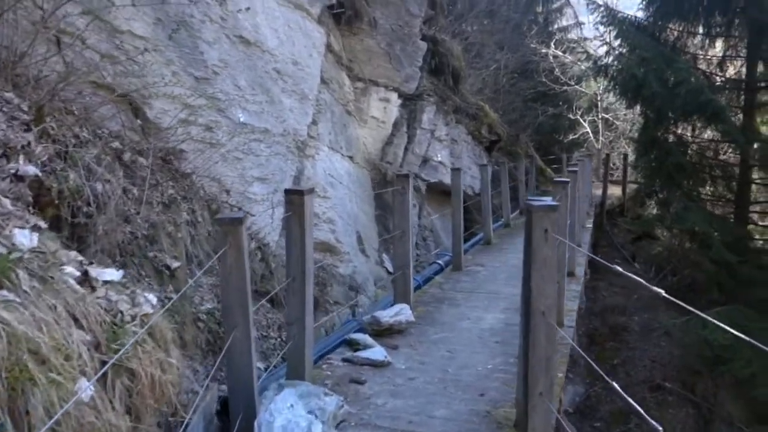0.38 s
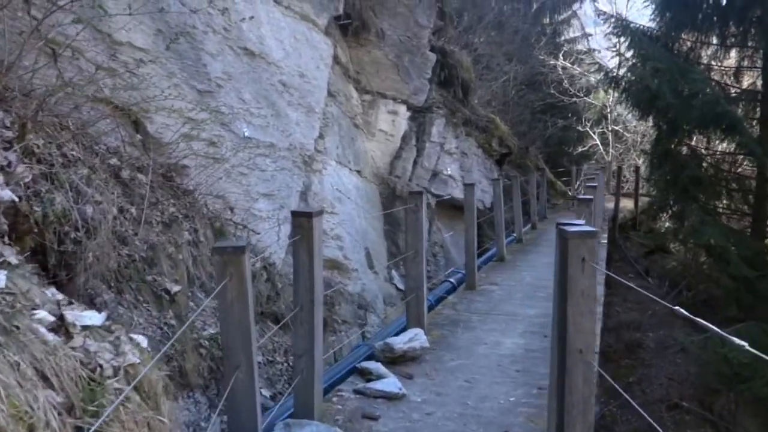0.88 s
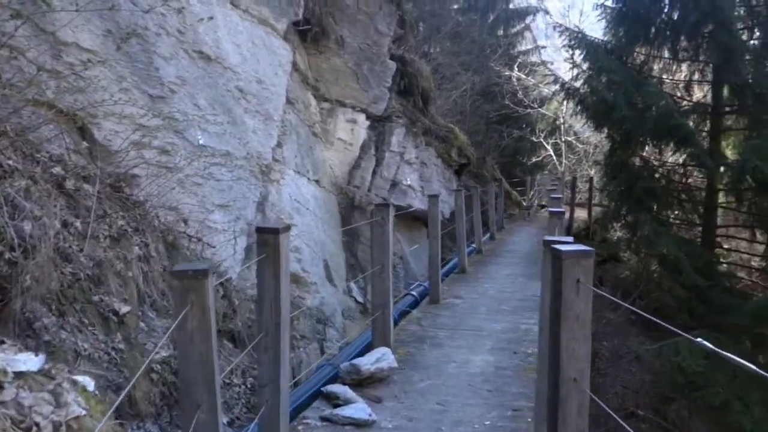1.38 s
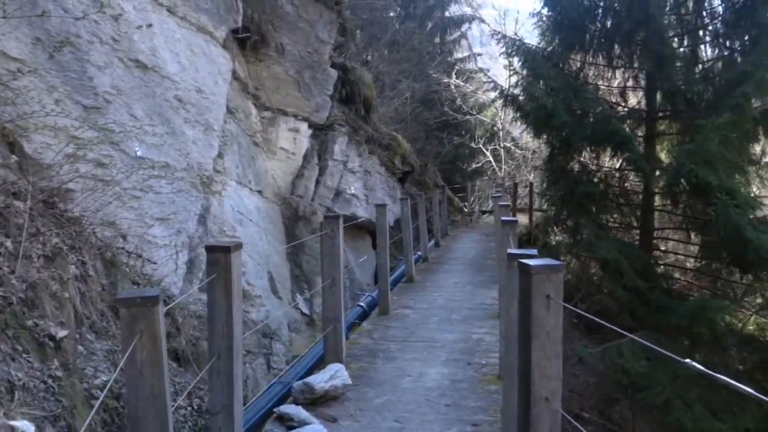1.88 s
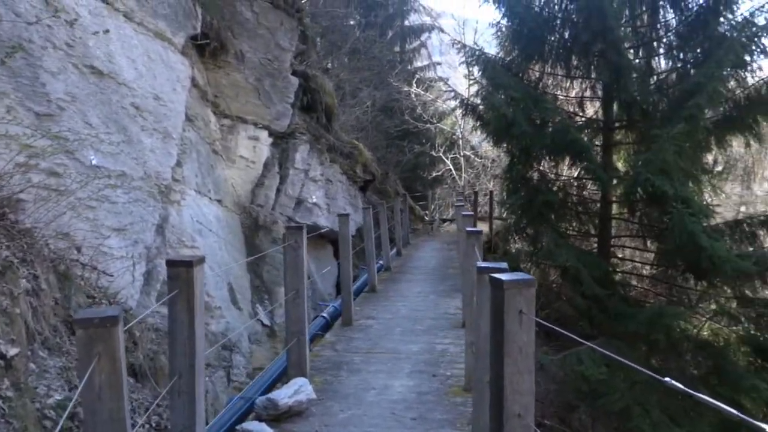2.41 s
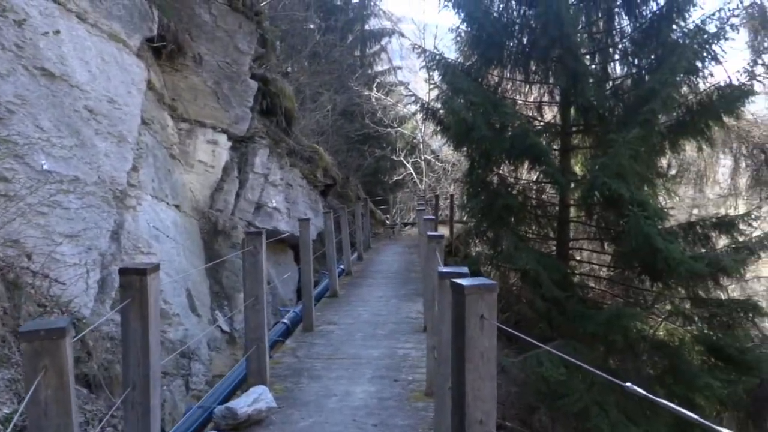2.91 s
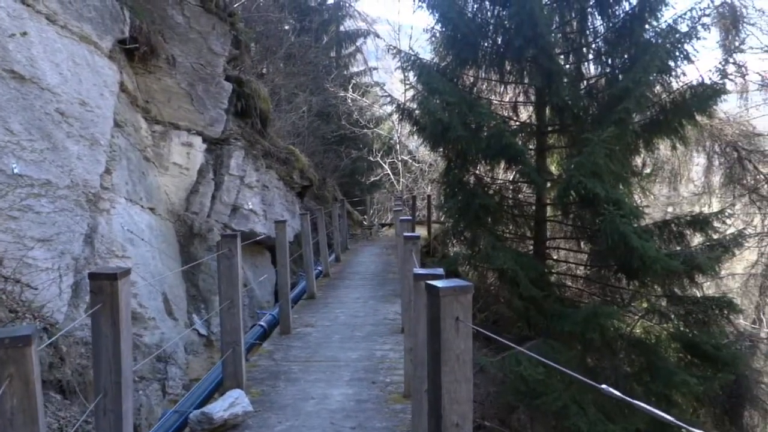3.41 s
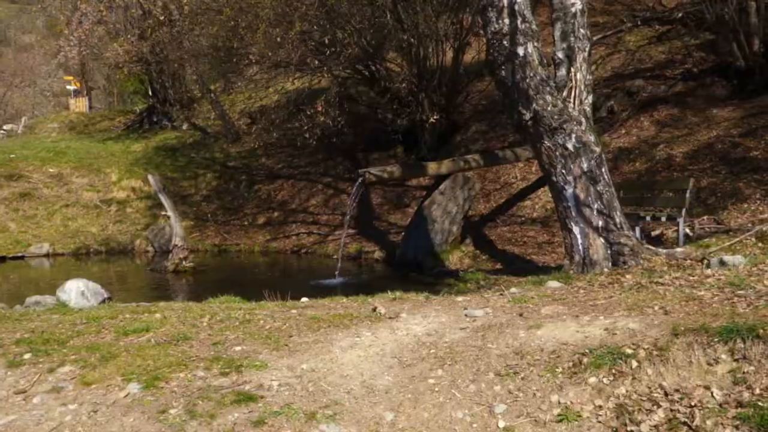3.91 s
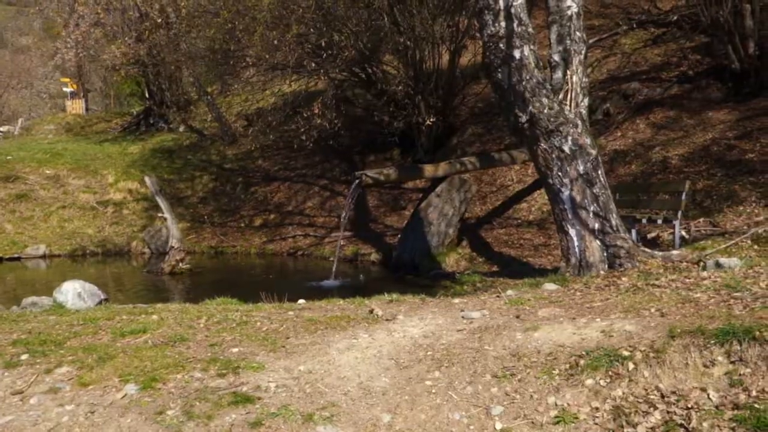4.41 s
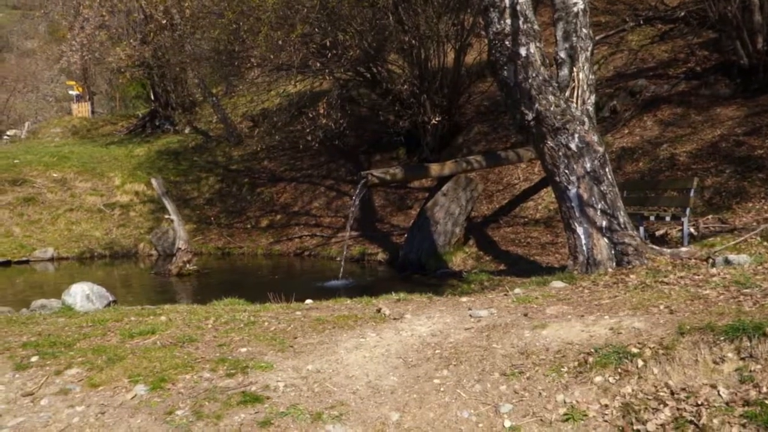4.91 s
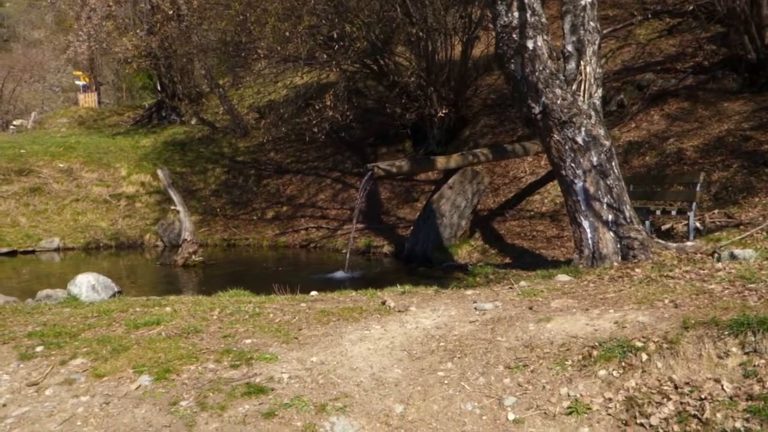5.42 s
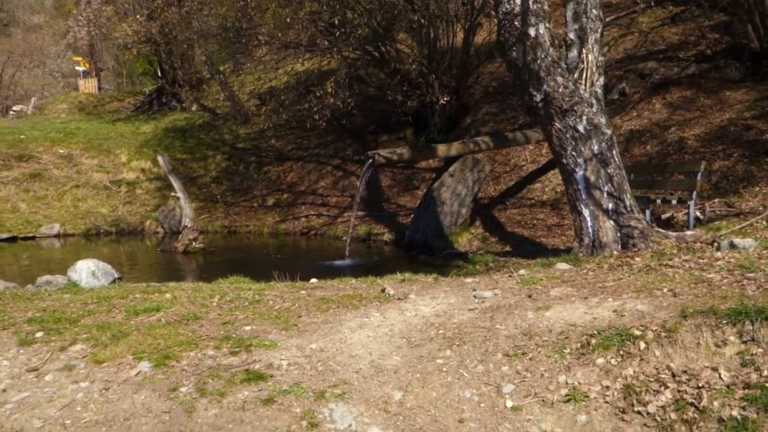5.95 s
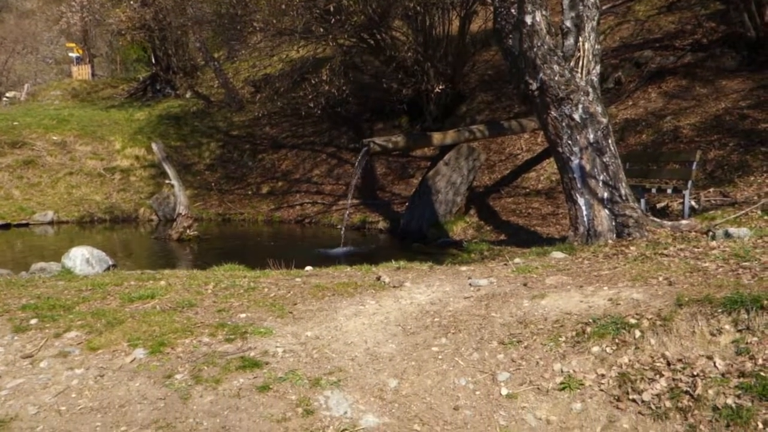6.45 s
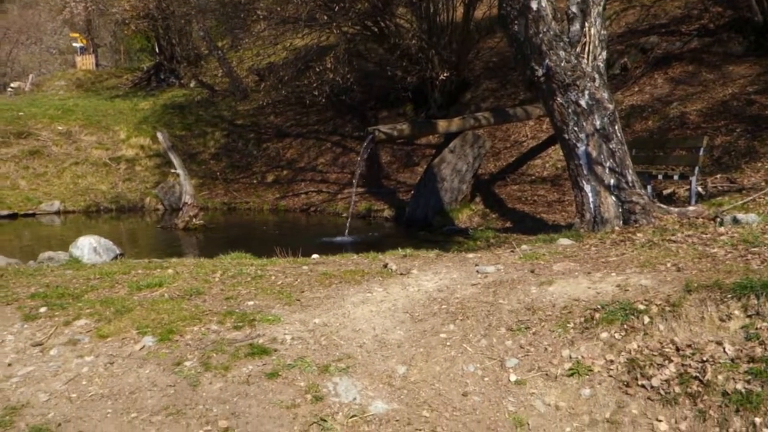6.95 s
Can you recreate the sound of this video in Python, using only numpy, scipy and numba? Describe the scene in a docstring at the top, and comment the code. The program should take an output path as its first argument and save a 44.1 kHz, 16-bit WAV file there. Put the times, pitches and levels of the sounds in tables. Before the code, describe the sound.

Outdoors on a cliff path, a faint steady stream rushes far below while tiny birds twitter very high; a dull knock comes early and a small bright tick late. It cuts off to a brief silence. Then, much louder, a thin jet of water splashes and plops into a pond, a bird on the left repeats a sweeping whistled phrase, and others chirp far away among trees. Stereo microphone, light low wind.

```python
"""The rush of a distant stream below a cliff path, faint high birds, a knock and late ticks; then a short silence.
Next a jet of water falls from a spout into a pond, a bird repeats its phrase close by on the left,
others call far off among trees, and light wind touches the microphone.
Stream, jet and wind are filtered noise that flickers band by band; bubbles, drops and knocks are damped rings.
Birds are near-sine whistles along pitch curves, with sprays of noise as echoes from trunks and rock."""
import sys
import numpy as np
from scipy import signal
from scipy.fft import rfft, irfft, next_fast_len
from scipy.io import wavfile
from scipy.ndimage import uniform_filter1d, map_coordinates
from numba import njit

SR = 44100
rng = np.random.default_rng(int(sys.argv[2]) if len(sys.argv) > 2 else 0)


def rack_gain(trim_db):
    """Turn a fader trim in dB into the linear factor to multiply a signal by."""
    fader = np.asarray(trim_db, float)
    return 10 ** (fader / 20)


def wav_record(signal):
    """Record a signal, one row per channel, as 16-bit PCM in the file named by sys.argv[1]."""
    frames = np.transpose(np.atleast_2d(signal))
    bounded = np.clip(frames, -1, 1)
    # unit amplitude maps onto the largest positive 16-bit level
    quanta = np.round(bounded * 32767).astype(np.int16)
    wavfile.write(sys.argv[1], SR, quanta)


N = 311787
T = np.arange(N) / SR

# how the pond fades in: time_s, gain (0-1)
POND_FADE = [(3.907, 0), (3.922, 0.94)]
# where the jet and its bubbles sit between the channels: frequency_hz, left_minus_right_db
JET_PAN = [(60, -4.5), (110, -6), (200, -6.5), (360, -7.5), (640, -1), (1170, -0.5), (2110, 0), (3830, 0),
           (6930, 0.5), (12600, 0)]


def curve(table, x, column=1):
    """Straight lines between table rows."""
    rows = np.array(table, float)
    return np.interp(x, rows[:, 0], rows[:, column])


def by_pitch(table, hz):
    """A table over frequency, read on a log axis."""
    rows = np.array(table, float)
    return np.interp(np.log(hz), np.log(rows[:, 0]), rows[:, 1])


def walk(rate):
    """Random levels held 1 / rate s and slewed twice; spread near 1."""
    k = int(SR / rate)
    steps = np.repeat(rng.standard_normal(N // k + 1), k)
    return 1.41 * uniform_filter1d(uniform_filter1d(steps, k), k)[:N]


def lowpass(x, hz):
    """Gentle second-order treble cut."""
    return signal.sosfilt(signal.butter(2, hz, fs=SR, output="sos"), x)


def place(x, pan_db, lag):
    """Two microphones: a level difference, and the right one hears it lag samples later."""
    late = map_coordinates(x, [np.arange(N) - lag], order=3)
    return np.array([x * rack_gain(pan_db / 2), late * rack_gain(-pan_db / 2)])


def echoes(x, t60, db, delay_s=0.0049):
    """Scattering from trunks and rock: a decaying spray of reflections, other ones in each channel."""
    t = np.arange(int(.6 * SR)) / SR
    tail = rng.standard_normal((2, len(t))) * (t > delay_s) * rack_gain(-60 * t / t60)
    tail *= rack_gain(db) / np.sqrt(np.sum(tail ** 2, axis=1, keepdims=True))
    return signal.fftconvolve(x[None], tail, axes=1)[:, :N]


def hiss(colour, like, pan, lag, rms_db, shared_db, own_db, rate):
    """Noise in half-octave bands; each band flickers alone and with the others."""
    size = next_fast_len(N)
    hz = np.maximum(np.fft.rfftfreq(size, 1 / SR), 1)
    left, other = rfft(rng.standard_normal((2, size)))
    alike = np.clip(by_pitch(like, hz), 0, 1)
    right = alike * left * np.exp(-2j * np.pi * hz * lag / SR) + np.sqrt(1 - alike ** 2) * other
    half_db = by_pitch(pan, hz) / 2
    pair = np.array([left * rack_gain(half_db), right * rack_gain(-half_db)]) * rack_gain(by_pitch(colour, hz))
    place_in_bank = 2 * np.log2(hz / 20)
    shared = walk(rate)
    out = 0
    for k in range(20):
        band = irfft(pair * np.clip(1 - abs(place_in_bank - k), 0, 1), size)[:, :N]
        out = out + band * rack_gain(shared_db * shared + own_db * walk(rate))
    return out * rack_gain(rms_db) / np.sqrt(np.mean(out.mean(0) ** 2))


@njit
def ring(out, start, hz, cycles, glide, size):
    """Damped rings whose pitch can rise as they die, as a bubble's does near the surface."""
    for k in range(len(start)):
        length = cycles[k] * SR / hz[k]
        phase = 0.
        for i in range(min(int(4 * length), len(out) - start[k])):
            u = i / length
            phase += 2 * np.pi * hz[k] * (1 + glide[k] * u) / SR
            out[start[k] + i] -= size[k] * np.sin(phase) * (1 - np.exp(-12 * u)) * np.exp(-u * u)
    return out


def grains(s, hz, cycles, db, glide):
    """Rings at given times; glide is the share by which pitch climbs over a ring's length."""
    return ring(np.zeros(N), (s * SR).astype(np.int64), 1. * hz, cycles + 0 * s, glide + 0 * s, rack_gain(db))


def from_jet(s, hz, cycles, db, glide):
    """Rings heard from where the jet lands: the low ones lean to the right."""
    half_db = by_pitch(JET_PAN, hz) / 2
    return np.array([grains(s, hz, cycles, db + side * half_db, glide) for side in (1, -1)])


def swarm(count, lo_hz, hi_hz, cycles, db, scatter_db, glide):
    """Many random rings over the pond, most of them small; columns as for grains."""
    u = rng.random((count, 5)).T
    first_s = POND_FADE[0][0]
    s = first_s + u[0] * (T[-1] - first_s)
    hz = lo_hz * (hi_hz / lo_hz) ** u[1]
    size_db = db - scatter_db * np.log(np.maximum(u[2], 1 / 50))
    return s, hz, cycles * (0.25 + 1.44 * u[3]), size_db, 2 * glide * u[4]


def whistle(notes, flutter_db=0., warble=0., edge_s=0.0021):
    """Near-sine notes along (s, Hz, dB) rows, with soft ends; level and pitch can tremble."""
    out = np.zeros(N)
    slow, fast = walk(90), walk(300)
    for note in notes:
        i = np.arange(int((note[0][0] - edge_s) * SR), min(int((note[-1][0] + edge_s) * SR), N))
        hz = uniform_filter1d(curve(note, i / SR), 90) * (1 + warble * fast[i])
        ends = np.clip(np.minimum(i - i[0], i[-1] - i) / (edge_s * SR), 0, 1)
        gain = rack_gain(curve(note, i / SR, 2) + flutter_db * slow[i])
        out[i] += np.sqrt(2) * gain * ends * np.sin(2 * np.pi * np.cumsum(hz) / SR)
    return out


def distant_stream():
    """A steady rush far below, coloured noise that swells and sinks as the air moves."""
    # spectrum of the rush: frequency_hz, level_db (per Hz)
    colour = [(18, -74), (30, -47), (71, -36.5), (264, -10.5), (298, -9), (346, -7), (392, -7), (477, -8.5),
              (527, -5.5), (567, -4.5), (1190, -10.5), (2100, -18.5), (2970, -30), (11000, -41.5),
              (14300, -72), (22000, -120)]
    # likeness of the two channels: frequency_hz, likeness (0-1)
    like = [(60, 0.96), (280, 0.98), (600, 0.96), (1300, 0.8), (2700, 0.43), (5800, 0.29), (11000, 0)]
    # stereo lean: frequency_hz, left_minus_right_db
    pan = [(60, 0), (110, -1), (200, -0.5), (360, -0.5), (640, -2.5), (1170, -3.5), (2110, -3), (3830, -5),
           (6930, 1.5), (12600, -3)]
    # swell of the rush: time_s, level_db
    rush = [(0, 0.5), (.2, 0.5), (.3, 0), (.42, 0), (.48, 0.5), (.8, -0.13), (1.4, -0.5), (2.4, .5),
            (3.2, -.5), (3.8, 0.5)]
    stream = hiss(colour, like, pan, lag=-1.9, rms_db=-40, shared_db=0.19, own_db=0.51, rate=6.43)
    low = lowpass(stream, 3000)
    swell_db = curve(rush, T)
    # the treble moves 3.5 times as far in dB
    return low * rack_gain(swell_db) + (stream - low) * rack_gain(3.5 * swell_db)


def cliff_birds():
    """Small birds: a held whistle with a falling chirp, and a thin twitter of glides high in the trees."""
    # whistle and chirp, one list a note: time_s (from call start), pitch_hz, level_db (within the call)
    call = [
        [(0, 5900, -12), (.015, 6700, -1), (.035, 7173, 0), (.065, 7374, -1), (.16, 7400, -14)],
        [(.168, 6280, -9), (.176, 4950, -3), (.185, 4180, -2.5), (.193, 3700, -4)],
    ]
    # when it calls: start_s, level_db, tempo_stretch (factor)
    call_times = [(1.595, -52.5, 1.02), (1.908, -52.5, .98)]
    # twitter, one glide a row: start_s, length_ms, from_hz, to_hz, level_db (in mid-glide)
    twitter = [(.015, 28, 8960, 9800, -54), (.04, 34, 8604, 8500, -54), (.075, 33, 8700, 10800, -49),
               (.112, 14, 10800, 10200, -48), (.128, 28, 9400, 8850, -52), (.175, 26, 9100, 7850, -51),
               (1.955, 42, 9200, 8650, -55), (1.995, 68, 8800, 9600, -59), (1.97, 70, 9650, 9650, -66),
               (2.05, 70, 9550, 9200, -58), (2.12, 25, 9200, 9800, -61), (2.145, 25, 9300, 8900, -63),
               (2.175, 95, 9170, 9550, -59.5), (2.3, 38, 9150, 9500, -55), (2.325, 58, 9600, 11000, -61),
               (2.395, 30, 11000, 9900, -58), (2.41, 41, 9100, 8750, -63), (2.5, 50, 9100, 9500, -61),
               (2.51, 30, 9800, 10200, -65), (2.55, 35, 9400, 9100, -64), (2.585, 55, 11000, 10700, -62),
               (2.64, 15, 10800, 9800, -60), (2.59, 39.8, 9100, 9400, -61), (2.645, 45, 8750, 9600, -58),
               (2.68, 15, 9600, 10060, -54), (2.697, 18, 10060, 9550, -52), (2.7, 80, 9200, 8980, -60),
               (2.782, 15, 9600, 10000, -65), (2.78, 55, 8600, 7400, -66), (2.85, 25, 7400, 7300, -68),
               (2.835, 55, 8800, 9000, -71), (3.165, 27, 9000, 8600, -68), (3.378, 28.3, 6880, 7250, -68),
               (3.735, 85, 8050, 8600, -61)]
    swell_db = 7.5  # a glide is this much softer at its ends than in its middle
    calls = [[(s0 + s * stretch, hz, db + gain_db) for s, hz, db in note]
             for s0, gain_db, stretch in call_times for note in call]
    glides = [[(s, lo, db - swell_db), (s + ms / 2000, (lo + hi) / 2, db), (s + ms / 1000, hi, db - swell_db)]
              for s, ms, lo, hi, db in twitter]
    birds = whistle(calls, flutter_db=2., warble=.003) + whistle(glides, flutter_db=4., warble=.006)
    # the long way round through the air takes the top off the echoes
    dull = lowpass(birds, 5500)
    return place(birds, 4., 1.5) + echoes(dull, .4, 4.) + echoes(birds, .25, -8.)


def path_knocks():
    """Knocks and ticks on the path, each a ring of a cycle or two with a short echo."""
    # start_s, pitch_hz, level_db, length_cycles
    knock_rings = [(.2214, 1250, -10.5, 1.0), (.2214, 2650, -31, 2.1), (.2272, 900, -26, 1.1),
                   (.2305, 497, -25, 1.6), (1.106, 111, -43, 1.7), (1.11, 483, -27, 2.),
                   (3.507, 7000, -28.5, .79), (3.515, 8000, -45, 1.)]
    s, hz, db, cycles = np.transpose(knock_rings)
    knocks = grains(s, hz, cycles, db, 0.)
    knocks = signal.sosfilt(signal.butter(2, 130, "high", fs=SR, output="sos"), knocks)
    # wooden knocks are dull, the late ticks bright
    ticks_s = s[hz > 4000].min() - .01
    knocks = np.where(T < ticks_s, lowpass(knocks, 4000), knocks)
    return place(knocks, -1., -.6) + echoes(knocks, .07, -5.)


def cliff():
    """Stream far below, small birds in the trees, a few knocks nearby, all cut steeply above 11.1 kHz."""
    out = distant_stream() + cliff_birds() + path_knocks()
    return signal.sosfilt(signal.ellip(10, .3, 60, 11100, fs=SR, output="sos"), out)


def far_birds():
    """Two arched notes a call, from so far that mostly their echoes arrive."""
    # one list a note: time_s (from call start), pitch_hz, level_db (within the call)
    call = [
        [(0, 4500, -3), (.012, 5800, -1), (.02, 6745, 6), (.03, 7060, -2), (.048, 5390, -25)],
        [(.072, 3800, -1), (.088, 4926, 5.5), (.108, 4010, -17)],
    ]
    # when they call: start_s, level_db, pitch_factor
    call_times = [(4.18, -28, 0.95), (5.875, -29, 0.99), (6.484, -26.5, 0.98), (6.754, -34, .86),
                  (6.945, -38, 1)]
    calls = [[(s0 + s, hz * factor, db + gain_db) for s, hz, db in note]
             for s0, gain_db, factor in call_times for note in call]
    far = whistle(calls, flutter_db=1.5, warble=.055)
    return place(far, .6, -3.) * rack_gain(-10.) + echoes(far, .45, 2.5, delay_s=.003)


def falling_trill():
    """Five quick notes on the left, each falling in pitch and louder than the one before."""
    start_s, gap_s, note_s = 6.338, .0155, .009
    top_hz, fall = 5200, .2  # fall: share of the pitch lost in a note
    notes = []
    for k in range(5):
        s = start_s + k * gap_s
        db = -38 + k * 1.5
        notes.append([(s, top_hz, db), (s + note_s, (1 - fall) * top_hz, db)])
    return place(whistle(notes), 5.4, -0.82)


def near_bird():
    """A singer close on the left repeats four sweeping notes; a ground reflection combs its tone."""
    # the four notes: time_s (from phrase start), pitch_hz, level_db (within the phrase)
    phrase = [
        [(0, 3240, -29), (.008, 3694, -22), (.016, 3983, -16), (.024, 3850, -16), (.044, 3060, -31.5)],
        [(.088, 4040, -32), (.105, 4196, -12.5), (.13, 4524, -22), (.134, 4430, -37)],
        [(.182, 5090, -31), (.19, 5394, -20), (.197, 5290, -18), (.207, 4685, -15.5), (.217, 3820, -19),
         (.222, 3540, -17)],
        [(.229, 3650, -22), (.24, 4650, -17), (.246, 5290, -21.5), (.253, 5044, -16.5), (.263, 4193, -15.5),
         (.273, 3683, -19.5), (.298, 3084, -27), (.315, 2800, -31.5)],
    ]
    # repeats, the first joined late and sung softly: start_s, then level_db of each of the four notes
    repeats = [(3.892, -60, -39, -24, -13), (4.29, -7, -2.5, -1, -0.5), (4.689, 0.5, 0, -1.5, -0.5),
               (5.0865, 0, 1.5, -1.5, -2)]
    notes = []
    for k, (s0, *gains_db) in enumerate(repeats):
        tempo = 1 - k * .01  # each repeat is a little shorter
        for note, gain_db in zip(phrase, gains_db):
            notes.append([(s0 + s * tempo, hz, db + gain_db) for s, hz, db in note])
    near = whistle(notes, flutter_db=.7)
    notch_gap_hz, bounce = 658.2, 0.93  # spacing of the notches, share of the reflection
    near += bounce * map_coordinates(near, [np.arange(N) - SR / notch_gap_hz], order=3)
    return place(near, 9.14, -5.0) + echoes(near, 0.99, -12.5)


def jet_and_wind():
    """Hiss of the falling jet with light wind in the bass, as flickering coloured noise."""
    # spectrum: frequency_hz, level_db (per Hz)
    colour = [(15, -44), (25, -4.5), (195, -3.5), (273, 2), (425, -6.5), (679, -2.5), (881, -7), (1060, -3),
              (1970, -4.5), (2490, -2.5), (5160, -5.5), (7430, -19), (10700, -18.5), (11600, -19),
              (12500, -28), (16200, -78), (22000, -120)]
    # likeness of the two channels: frequency_hz, likeness (0-1)
    like = [(130, 0), (280, 0.48), (600, 0.27), (1300, 1), (2700, 0.24), (4000, 0), (6500, 0.22),
            (8000, 0.67), (12000, 0.8)]
    return hiss(colour, like, JET_PAN, lag=-0.33, rms_db=-30, shared_db=0.38, own_db=3.04, rate=28.)


def fizz():
    """A dense spray of tiny high rings."""
    return from_jet(*swarm(count=3000, lo_hz=2500.0, hi_hz=11000., cycles=3.2, db=-39.5,
                           scatter_db=4.0, glide=0.037))


def bubbles(flow):
    """Trapped air rings at a pitch set per bubble: clear plops, their small fragments and two random swarms."""
    # the clearest bubbles: start_s, pitch_hz, level_db, length_ms
    clear = [(3.932, 1920, -20.5, 4), (3.954, 1690, -26, 7.6), (4, 328, -24, 9), (4.002, 1300, -22, 9),
             (4.04, 1170, -23, 9), (4.065, 630, -23.5, 8.7), (4.136, 1340, -18.5, 6),
             (4.137, 731, -20.5, 24), (4.154, 1740, -15.5, 3.6), (4.193, 1110, -17.5, 9.5),
             (4.193, 1780, -21, 5.1), (4.206, 1700, -21, 3.1), (4.255, 2230, -21, 6),
             (4.311, 1300, -26, 8.8), (4.421, 957, -23, 15), (4.439, 1300, -18.5, 4),
             (4.44, 2576, -25.5, 10), (4.497, 277, -29, 37), (4.679, 1530, -24, 6), (4.706, 1330, -23, 3.4),
             (4.774, 262, -25, 18), (4.774, 2530, -16, 1.7), (4.853, 2390, -25, 6), (4.884, 278, -33, 49),
             (4.967, 1010, -20, 6.8), (5.013, 1285, -20.5, 8.7), (5.176, 269, -33, 25),
             (5.204, 1430, -22, 3), (5.204, 2310, -21, 8), (5.254, 1070, -19.5, 4.3),
             (5.296, 1320, -19.5, 4.1), (5.316, 2030, -17, 2.7), (5.323, 1156, -16, 6.5),
             (5.337, 255, -29, 18), (5.433, 1320, -22, 4), (5.485, 910, -20, 3.4), (5.523, 2340, -22, 4),
             (5.558, 690, -26.5, 10.4), (5.562, 1860, -19, 3), (5.603, 2430, -12.5, 2.3),
             (5.648, 2580, -23, 4), (5.718, 2130, -17.5, 1.7), (5.761, 434, -27, 12), (5.809, 484, -23, 7),
             (5.838, 690, -21.5, 5.6), (5.865, 1045, -20, 8), (5.915, 2890, -22, 7),
             (5.958, 2650, -15, 1.5), (5.983, 2310, -20, 3), (6.003, 399, -18, 4.7),
             (6.011, 540, -22.5, 10.6), (6.02, 740, -20, 15.5), (6.028, 970, -23, 7), (6.035, 1200, -22, 8),
             (6.039, 1520, -17, 1.7), (6.121, 748, -29, 25), (6.133, 1010, -27, 9), (6.145, 1340, -20, 5.1),
             (6.154, 1670, -19, 6), (6.281, 1005, -18.5, 8), (6.284, 2700, -23, 3), (6.292, 585, -26, 6),
             (6.3, 896, -25, 10), (6.391, 680, -31, 8), (6.446, 730, -22, 4.6), (6.505, 1220, -20, 4.3),
             (6.523, 1150, -23.5, 7), (6.595, 2500, -20.5, 3.4), (6.753, 2430, -25, 9.1),
             (6.804, 1115, -23, 8.6), (6.83, 1570, -22, 3), (6.851, 2460, -22, 4),
             (6.898, 1240, -20.5, 4.6), (6.941, 710, -20.5, 5.1), (6.975, 2570, -15.5, 4.3),
             (7.004, 2150, -24, 3.8)]
    rise = 0.015  # share by which the pitch climbs over a bubble's length
    s, hz, db, ms = np.transpose(clear)
    out = from_jet(s, hz, hz * ms / 1000, db, rise)
    # each clear bubble breaks up with four smaller ones, close in time, higher and softer
    for u in rng.random((len(s), 4, 3)).transpose(1, 2, 0):
        small_s = s + .014 * (2 * u[0] - 1)
        small_hz = hz * 2 ** (1.31 * u[1])
        out += from_jet(small_s, small_hz, 2 + 3 * u[2], db - 11, rise)
    out += flow * from_jet(*swarm(count=2200, lo_hz=420.8, hi_hz=3555.0, cycles=5.7, db=-43.0,
                                  scatter_db=4., glide=0.079))
    out += from_jet(*swarm(count=30, lo_hz=236.0, hi_hz=406.0, cycles=6.4, db=-35.5,
                           scatter_db=2., glide=0.015))
    return out


def drop_impacts():
    """Sharp clicks of drops: less than one cycle of a high ring, each at its own place."""
    # start_s, level_db, left_minus_right_db
    impacts = [(5.099, -8.5, 10), (5.1383, -6, -10), (5.478, -11, 0), (5.6426, -26, 0), (5.7359, -10, .5),
               (5.7633, -14, 1), (5.9584, -23, -2), (6.0736, -12, 1), (6.1723, -11, -4), (6.56, -15, 6),
               (6.8493, -22, .5)]
    s, db, pan_db = np.transpose(impacts)
    return np.array([grains(s, 6500 + 0 * s, 0.69, db + side * pan_db / 2, 0.) for side in (1, -1)])


def water():
    """The jet hisses, traps air in bubbles of all sizes and throws drops."""
    # how hard the jet strikes the pond: time_s, level_db
    strike = [(3.93, 2), (4.14, -1), (4.22, 0.5), (4.3, 1.2), (4.93, 0), (5.02, 1), (5.14, -0.5), (5.25, 2),
              (5.53, -1.5), (5.65, 2.5), (5.72, -1.5), (6.04, 2), (6.3, 2), (6.69, -1.5), (6.97, -0.3),
              (7.07, 1)]
    flow = rack_gain(curve(strike, T) + 1 * walk(25.))  # it also wavers by about 1 dB by chance
    plops = bubbles(flow)
    # the hiss follows the flow less than the fizz does
    out = flow ** 0.37 * jet_and_wind() + flow * fizz()
    return out + plops + drop_impacts() + echoes(plops.mean(0), 0.091, -7.5)


def thin_hidden_treble(x, margin_db, slope_db, scatter_db, from_hz, top_hz, top_db):
    """Processing of a mix: treble patches that a louder, lower sound would hide drop out, in mid and side."""
    size, width = 1024, 6  # frame in samples, patch in frequency bins
    z = signal.stft(np.array([x[0] + x[1], x[0] - x[1]]) / 2, nperseg=size, window="cosine")[2]
    bands = (size // 2) // width
    power = (abs(z[:, :bands * width]) ** 2).reshape(2, bands, width, -1).sum(2)
    power_db = 10 * np.log10(power + 1e-14)
    # the cover of a loud band reaches upward, falling by slope_db a band
    ramp = slope_db * np.arange(bands)[:, None]
    cover_db = np.maximum.accumulate(uniform_filter1d(power_db.max(0), 4) + ramp, axis=0) - ramp
    spare_db = uniform_filter1d(power_db, 4) - cover_db + margin_db
    spare_db += scatter_db * uniform_filter1d(rng.standard_normal(spare_db.shape), 7)
    spare_db[:, int(top_hz / SR * size / width):] -= top_db
    keep = np.clip(.5 + spare_db / 2, .003, 1)
    keep[:, :int(from_hz / SR * size / width)] = 1
    z[:, :bands * width] *= np.repeat(keep, width, axis=1)
    mid, side = signal.istft(z, nperseg=size, window="cosine")[1][:, :N]
    return np.array([mid + side, mid - side])


def scene():
    """The cliff, a gap, then the pond, its mix processed so that the treble is thinned in patches."""
    # how the cliff fades out: time_s, gain (0-1)
    cliff_fade = [(3.802, 0.9), (3.821, 0.63), (3.823, 0)]
    pond = far_birds() + falling_trill() + near_bird() + water()
    thinned = thin_hidden_treble(pond, margin_db=17., slope_db=.62, scatter_db=17., from_hz=5700,
                                 top_hz=11300, top_db=9.)
    return cliff() * curve(cliff_fade, T) + thinned * curve(POND_FADE, T)


def low_pass(x):
    """Removes everything above the highest recorded frequency."""
    return signal.sosfilt(signal.butter(12, 13150, fs=SR, output="sos"), x)


def record(dry):
    """The recorder cuts the top steeply above 12.3 kHz."""
    mix = signal.sosfilt(signal.ellip(8, .3, 60, 12300, fs=SR, output="sos"), dry)
    return low_pass(mix)


dry = scene()
out = record(dry)
wav_record(out)
```